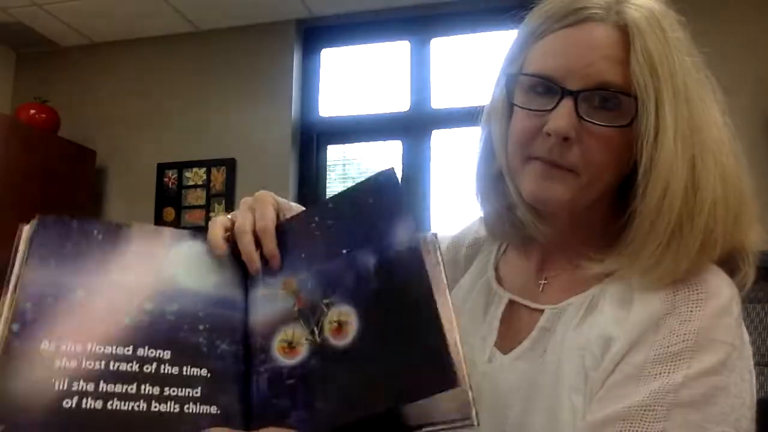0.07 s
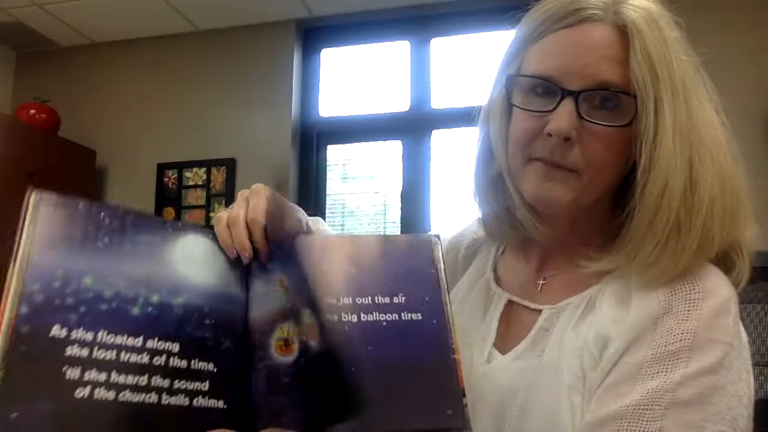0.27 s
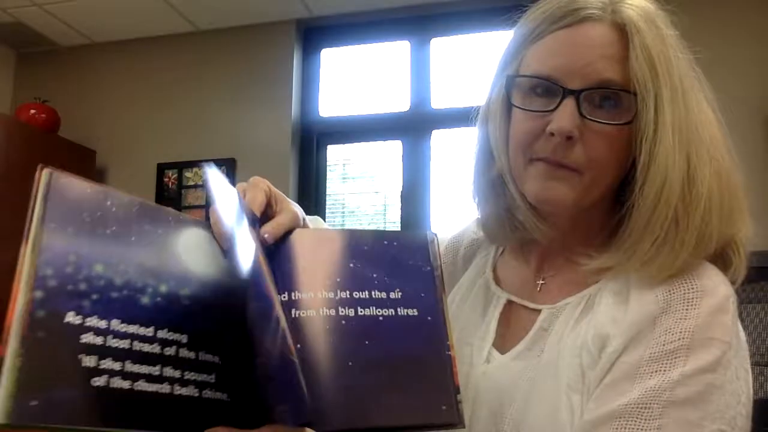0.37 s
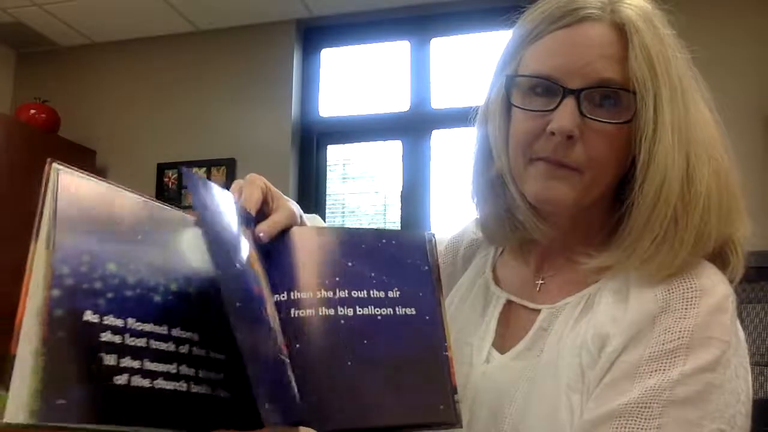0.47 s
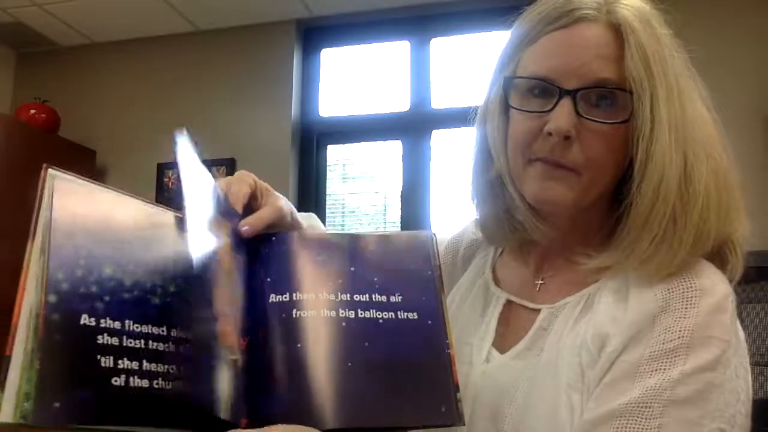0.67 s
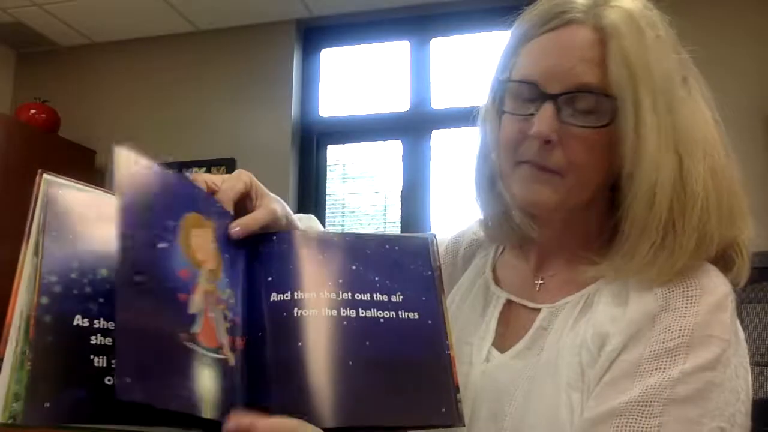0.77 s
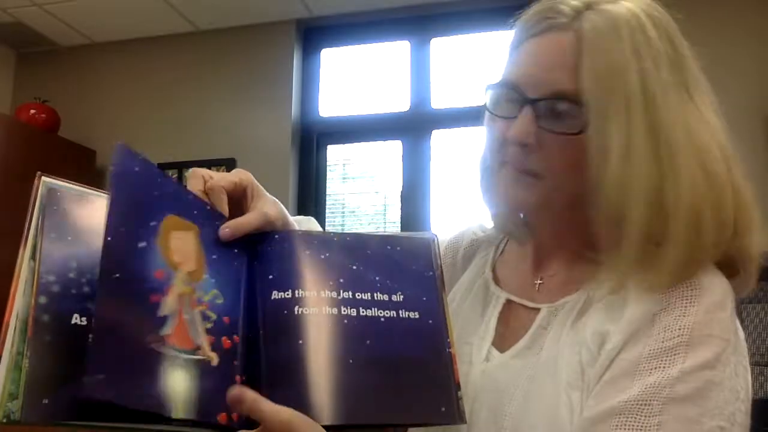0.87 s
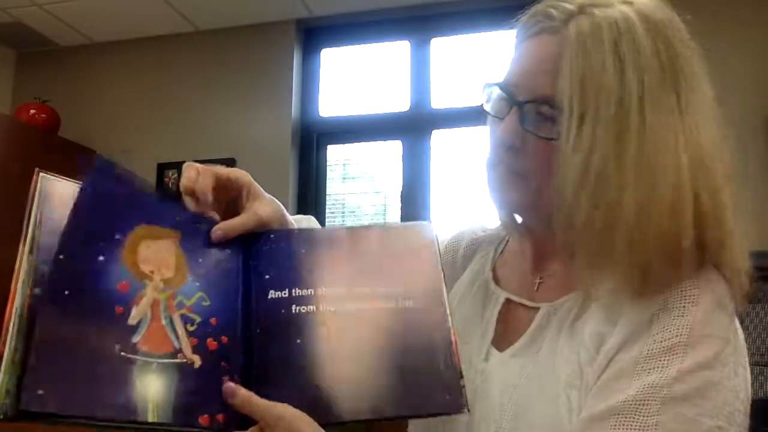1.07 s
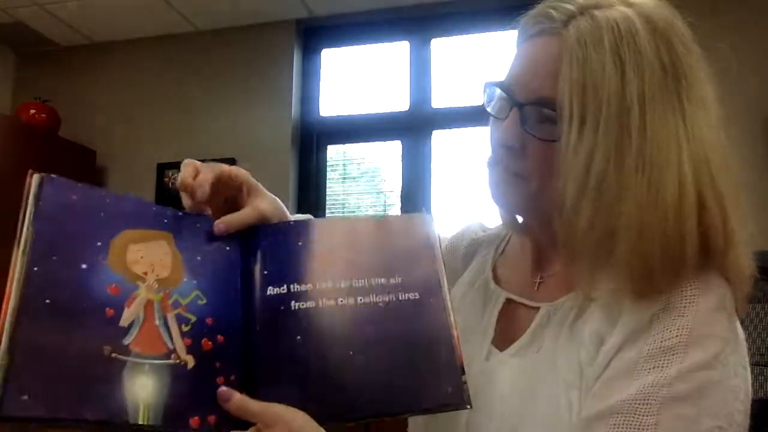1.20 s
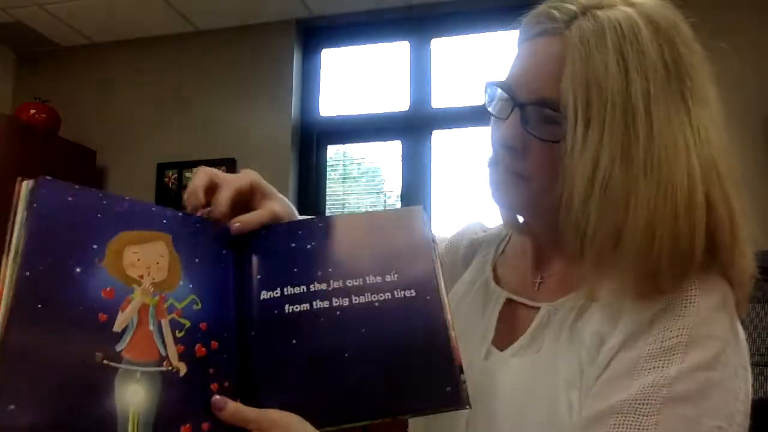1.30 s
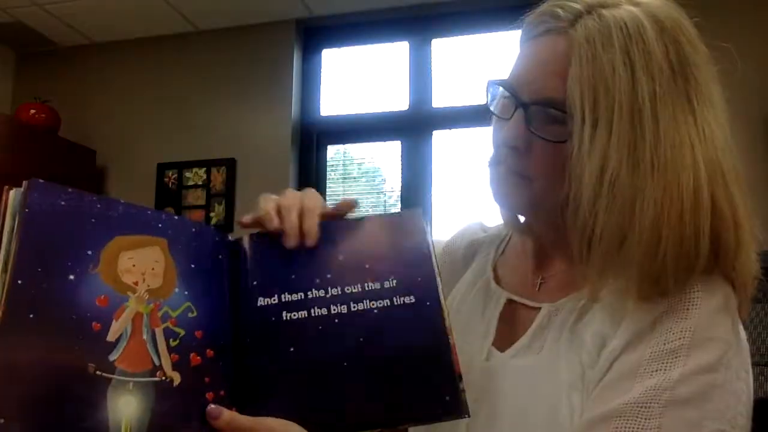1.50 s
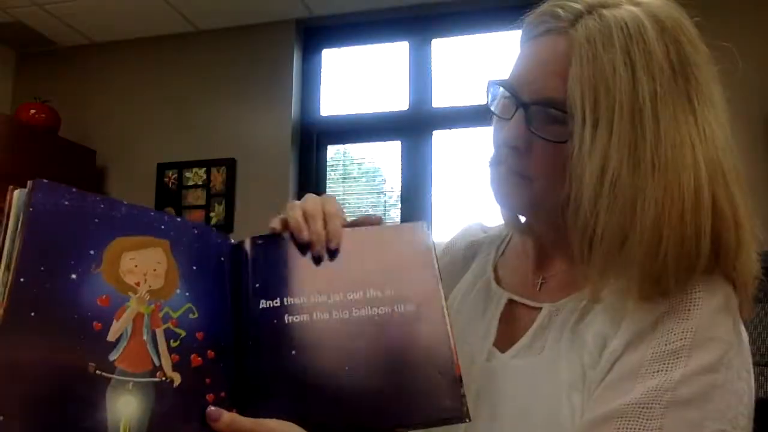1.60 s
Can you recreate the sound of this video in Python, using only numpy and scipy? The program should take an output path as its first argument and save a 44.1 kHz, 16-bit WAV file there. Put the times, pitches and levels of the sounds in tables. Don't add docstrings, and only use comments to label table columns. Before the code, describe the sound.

A large glossy page of a picture book is lifted with a faint dry rustle, sweeps over in a louder papery swish, then lands with soft flaps and crinkly snaps, close to a small microphone indoors.

```python
import sys
import numpy as np
from scipy import signal
from scipy.io import wavfile
from scipy.ndimage import uniform_filter1d

SR = 44100
rng = np.random.default_rng(int(sys.argv[2]) if len(sys.argv) > 2 else 0)


def boost_factor(decibels):
    exponent = np.asarray(decibels, float) / 20
    return 10 ** exponent


def wav_out(sig):
    wavfile.write(sys.argv[1], SR, np.round(np.clip(np.atleast_2d(sig).T, -1, 1) * 32767).astype(np.int16))


N = 72765

# time_s, level_db, ring_hz, top_edge_hz, belly_db (extra low-mid body of the sheet)
LIFT = [
    (0, -63.5, 3840, 6500, 5),
    (0.073, -71.5, 3600, 5900, 10),
    (0.084, -56.5, 3600, 5600, 6),
    (0.126, -67.5, 2600, 4960, 24),
    (0.133, -50.5, 3760, 6600, 5),
    (0.155, -51.5, 3940, 6600, 0),
    (0.178, -61.5, 3940, 6200, 6),
    (.199, -52, 3900, 6400, -12),
    (0.205, -46.5, 3630, 7200, -11),
]
RAISE = [
    (.255, -47.5, 3440, 7200, -13.5),
    (0.297, -54.5, 3300, 5400, -10),
    (.318, -52.5, 3400, 5000, 2),
    (0.335, -46.5, 3240, 6140, -5.5),
    (.37, -45.5, 3220, 4930, -4),
    (0.402, -42, 3150, 5840, 2),
    (0.472, -44.5, 3270, 4800, 8.5),
    (0.498, -51, 2500, 4330, 17),
]
SWEEP = [
    (0.511, -39.5, 2880, 6400, -3),
    (0.543, -39.5, 2860, 6360, 15),
    (0.574, -39.5, 2860, 6700, 4.5),
    (0.612, -34, 2590, 7500, 1.5),
    (.645, -31, 2360, 7500, -2),
    (0.678, -33.5, 3370, 6700, 4),
    (0.702, -41, 3500, 5560, -2.5),
    (.75, -49, 3500, 4900, 3),
]
SETTLE = [(0.818, -64, 3470, 4670, 5), (.84, -62, 3080, 4620, -1), (.847, -55.5, 2750, 5100, 1),
          (.91, -55, 2500, 4050, -3), (0.946, -48.5, 1960, 2900, 14), (0.962, -38, 1790, 2860, 14),
          (1.01, -52.5, 1830, 3100, 9), (1.029, -46, 2260, 3960, 4), (1.093, -51.5, 1800, 3030, -9),
          (1.111, -49, 2310, 6600, 19.5), (1.162, -53, 1700, 5200, 5.5), (1.181, -44.5, 1810, 3520, 6),
          (1.191, -57, 1880, 3460, 10), (1.211, -55.5, 1860, 3270, -1), (1.239, -67.5, 2170, 6450, 0.5),
          (1.322, -66.5, 2400, 6500, 10), (1.336, -81, 2400, 6080, -6)]
# pitch_hz, level_db
PAPER_COLOUR = [(240, -65), (500, -32.5), (800, -18.5), (1400, -5.5), (2400, -6.5), (5900, -13),
                (8500, -23), (12000, -32)]

# start_s, length_s, level_db, low_scrape_db (relative to the hiss)
RUBS = [(0, 0.016, -67, 14), (0.135, 0.039, -65.5, 9.5), (0.194, 0.046, -58, 2), (0.221, .055, -54, 5.5),
        (0.293, 0.24, -81, 25), (0.541, 0.029, -69.5, 19), (0.578, 0.051, -60.5, 7),
        (0.617, 0.054, -52.5, 6), (0.657, .042, -49.5, 2), (0.826, 0.072, -60, -2),
        (1.022, 0.064, -54.5, 0.5), (1.093, 0.053, -54, 6), (1.172, 0.019, -49.5, -10),
        (1.198, 0.024, -58, -25), (1.274, 0.061, -71, 5.5), (1.351, 0.036, -56.5, -17),
        (1.413, 0.021, -62.5, -10.5), (1.423, 0.04, -57, -18.5), (1.512, 0.042, -56, 3),
        (1.543, 0.061, -61.5, 1.5), (1.612, 0.055, -59.5, -16.5)]
# pitch_hz, level_db
SKIN_HISS = [(5290, -60), (9000, -43), (11000, -19.5), (11600, -5.5), (12300, -5.5), (13100, 1.5),
             (14100, 1), (14900, 0.5), (16200, -25)]
# pitch_hz, level_db
SKIN_SCRAPE = [(1500, -31), (2400, -16.5), (3900, -19), (4500, -21), (5000, 2), (5740, -3), (7160, -9),
               (10000, -25.5)]

# pitch_hz, level_db
AIR_COLOUR = [(30, -12), (70, -11.5), (150, -3.5), (350, -7), (1200, -22), (2700, -14), (8200, -23.5),
              (16200, -20)]
# pitch_hz, width_hz, boost_db
HUM = [(130, 45, 8), (68.7, 18.7, 3.4)]

# time_s, peak_db, ring_hz, treble_db, push_ms
SNAPS = [(0.0826, -33, 3500, 1.5, 0.76), (.0985, -46, 3560, -30, 2.7), (0.1047, -41, 1770, -37, 3.9),
         (0.204, -37, 2320, -30, 4.7), (0.5103, -31, 2567, -38, 7.3), (0.5466, -21.5, 2600, -25, .3),
         (.605, -18.5, 2630, -46, 4), (.612, -16, 2490, -39, 4.1), (.628, -16, 2660, -35, 3.6),
         (.844, -46, 2410, -40, 7.2), (0.868, -44, 2420, -40, 2.3), (0.8975, -38.5, 2290, -48.5, 9.5),
         (0.9186, -36, 1630, -49, 2.9), (.92, -37, 2570, -56, 3), (0.9197, -34.5, 900, -15, 1.7),
         (0.936, -38.5, 940, -51, 8), (.9495, -30, 1130, -49, 1.7), (0.9586, -18.5, 1854, -42, 2.64),
         (.9585, -26.5, 2650, -89, 3.7), (0.9592, -28, 1120, -29, 1.7), (.9635, -33.5, 857, -48, 2.3),
         (0.967, -36, 1800, -75, 3.7), (0.9753, -30, 1340, -50, 3), (.98, -37, 1810, -65, 2.1),
         (.985, -41, 1630, -60, 1.8), (1.013, -35, 1490, -50, 3.1), (1.022, -37.5, 2600, -60.5, 7.7),
         (1.0409, -29, 2600, -40, 1.9), (1.066, -32, 1940, -58, 2.3), (1.1029, -20, 1930, -19, 1.37),
         (1.105, -32.5, 3860, 2.5, 1.1), (1.1074, -15, 2530, -1.5, 1.43), (1.1086, -21, 1640, -28, 0.84),
         (1.1295, -33, 2300, -20, 0.86), (1.144, -28, 1650, -19, 1.2), (1.145, -29, 1670, -10, 3.1),
         (1.1827, -35.5, 2170, -15, 1.2), (1.1973, -29, 1850, -6, 1.35), (1.313, -50, 2310, -11, 8.4)]
# start_s, length_s, level_db, pitch_hz, width_share (of the pitch)
FLAPS = [
    (0.107, 0.025, -54.5, 530, 0.65),
    (0.116, 0.082, -62, 460, 1.4),
    (0.126, 0.038, -60.5, 1030, 0.86),
    (0.524, 0.28, -69.5, 323, 1.6),
    (0.904, 0.06, -57.5, 320, 1.1),
    (0.937, 0.077, -52, 268, 0.89),
    (.916, 0.13, -57.5, 710, 1.2),
    (1.107, .02, -55.5, 272, 0.98),
]
# pitch_hz, width_hz, boost_db
CAVITY = [(1018, 120, 3.5), (1371, 114, -10), (2400, 140, 3), (3150, 200, 0), (3950, 570, 4.5),
          (5050, 460, -3), (5930, 260, 3), (7500, 1110, -10), (8500, 1240, 4.5), (12390, 660, 6.5),
          (12860, 400, -10), (14500, 660, 0.5)]


def evened(x):
    return x / np.sqrt(np.mean(x ** 2) + 1e-20)


def read(points, hz):
    f, value = np.transpose(points)
    return np.interp(np.log(hz + 1), np.log(f + 1), value)


def add(mix, s, sound):
    part = mix[round(s * SR):][:len(sound)]
    part += sound[:len(part)]


def bumps(peaks, hz):
    return sum(db / (1 + (2 * (hz - f) / width) ** 2) for f, width, db in peaks)


def colour(x, db_of_hz):
    hz = abs(np.fft.fftfreq(4096, 1 / SR))
    log = np.log(boost_factor(np.maximum(db_of_hz(hz), -100)))
    taps = np.fft.ifft(np.exp(log - 1j * signal.hilbert(log).imag)).real[:2048]
    return signal.oaconvolve(x, taps)[:len(x)]


def ring(x, hz, width):
    b, a = signal.iirpeak(hz, hz / width, SR)
    for _ in range(3):
        x = signal.lfilter(b, a, x)
    return x


def grains(per_s, spread_db, clump_db, clump_s):
    chance, extra = rng.random(N), rng.exponential(1, N)
    slip, drift = rng.standard_normal(N), rng.standard_normal(N)
    span = max(int(clump_s * SR), 2)
    clumps = evened(uniform_filter1d(uniform_filter1d(drift, span), span))
    size = boost_factor(spread_db * np.minimum(extra, 3) + clump_db * clumps)
    return evened((chance < per_s / SR) * slip * size)


def patchy(x, patch_db):
    z = signal.stft(x, SR, nperseg=512, noverlap=384)[2]
    patches = uniform_filter1d(rng.standard_normal(z.shape), size=3, axis=0)
    patches = uniform_filter1d(patches, size=9, axis=1)
    z = z * boost_factor(patch_db * evened(patches))
    return evened(signal.istft(z, SR, nperseg=512, noverlap=384)[1][:N])


def page():
    ring_db, ring_oct, edge_db_per_oct = 8, 0.32, 39.5
    ring_gain_per_db, ring_ref_db = 0.1, -44
    edge_ring_hz, edge_ring_oct, edge_ring_share = 5960, 0.043, 0.36
    belly_hz, belly_oct = 950, 0.68
    s, level_db, ring_hz, edge_hz, belly_db = np.transpose(LIFT + RAISE + SWEEP + SETTLE)

    slips = grains(per_s=15000, spread_db=1.2, clump_db=1.1, clump_s=.004)
    slips = patchy(slips, patch_db=2.5)
    hz, t, z = signal.stft(slips, SR, nperseg=256, noverlap=192)
    f = hz[:, None] + 50

    depth_db = ring_db + ring_gain_per_db * (ring_ref_db - np.interp(t, s, level_db))
    depth_db = np.clip(depth_db, 1, 14)
    hump = depth_db / (1 + (np.log2(f / np.interp(t, s, ring_hz)) / ring_oct) ** 2)
    edge_ring = edge_ring_share * depth_db / (1 + (np.log2(f / edge_ring_hz) / edge_ring_oct) ** 2)
    edge = -np.clip(edge_db_per_oct * np.log2(f / np.interp(t, s, edge_hz)), 0, 22)
    belly = np.interp(t, s, belly_db) * np.exp(-(np.log2(f / belly_hz) / belly_oct) ** 2)

    smooth = boost_factor(read(PAPER_COLOUR, hz)[:, None] + hump + edge_ring + edge + belly)
    smooth[:2] = 0
    shape = smooth / np.sqrt((smooth[8:41] ** 2).sum(0) / len(hz))
    x = signal.istft(z * shape, SR, nperseg=256, noverlap=192)[1][:N]
    steady = np.sqrt(uniform_filter1d(uniform_filter1d(x ** 2, size=900), size=900) + 1e-9)
    return x / steady * boost_factor(np.interp(np.arange(N) / SR, s, level_db, right=-120))


def fingers():
    rise_share, fall_share, fade_db = 0.24, 0.36, -14
    slips = grains(per_s=9600, spread_db=1.5, clump_db=1.1, clump_s=0.0043)
    slips = patchy(slips, patch_db=3.5)
    hiss = evened(colour(slips, lambda f: read(SKIN_HISS, f)))
    scrape = evened(colour(slips, lambda f: read(SKIN_SCRAPE, f)))
    out = np.zeros(N)
    for s, length, db, low_db in RUBS:
        u = np.arange(0, 1, 1 / (length * 1.24 * SR))
        ramp = np.clip(np.minimum(u / rise_share, (1 - u) / fall_share), 0, 1)
        shape = np.sin(np.pi / 2 * ramp) ** 2 * boost_factor(fade_db * u)
        at = np.minimum(round(s * SR) + np.arange(len(u)), N - 1)
        add(out, s, boost_factor(db) * shape * (hiss[at] + boost_factor(low_db) * scrape[at]))
    return out


def room_hiss():
    noise = rng.standard_normal(N)
    return boost_factor(-73.5) * evened(colour(noise, lambda f: read(AIR_COLOUR, f) + bumps(HUM, f)))


def whine():
    count, start_s, per_s, burst_s = 50, .0105, 30, .009
    pitch_hz, level_db, spread_db, jitter_s = 11050, -69, 3.5, 0.00031
    out, t = np.zeros(N), np.arange(0, burst_s, 1 / SR)
    burst = np.sin(np.pi * t / burst_s) * np.sin(2 * np.pi * pitch_hz * t)
    for k, (louder, later) in enumerate(rng.standard_normal((count, 2))):
        add(out, start_s + k / per_s + jitter_s * later, boost_factor(level_db + spread_db * louder) * burst)
    return out


def snaps():
    width_share, upper_ratio, upper_width_share, upper_db = .9, 1.9, 0.46, -7
    tail_s, tail_db = 0.029, -22
    out, t = np.zeros(N), np.arange(3000) / SR
    fizz = rng.standard_normal((len(SNAPS), len(t)))
    for (s, db, hz, treble_db, push_ms), n in zip(SNAPS, fizz):
        push = np.sin(np.pi * np.clip(t * 1000 / max(push_ms, .06), 0, 1)) ** 2
        tail = boost_factor(tail_db - 60 * t / tail_s) * n * np.minimum(t * 1000, 1)
        body = ring(push * (np.sin(2 * np.pi * hz * t) + .5 * n) + tail, hz, width_share * hz)
        upper = ring(push * n + tail, hz * upper_ratio, upper_width_share * hz)
        tick = evened(colour(push * n, lambda f: read(SKIN_HISS, f)))
        tick = tick + evened(colour(push * n, lambda f: read(SKIN_SCRAPE, f)))
        upper_gain = boost_factor(upper_db + 0.25 * treble_db)
        snap = body / abs(body).max() + upper_gain * upper / abs(upper).max()
        snap = snap + boost_factor(treble_db) * tick / abs(tick).max()
        add(out, s, boost_factor(db - 5.5) * snap)
    return out


def flaps():
    out, noise = np.zeros(N), rng.standard_normal((len(FLAPS), 16000))
    for (s, length, db, hz, share), n in zip(FLAPS, noise):
        u = np.arange(n.size) / SR / length
        shape = np.minimum(u / .12, 1) * np.exp(-2.5 * u * u)
        puff = ring(n, hz, share * hz) * shape
        add(out, s, boost_factor(db) * puff * np.linalg.norm(shape) / np.linalg.norm(puff))
    return out


def room(x):
    t60_s = .09
    taps = np.zeros(8000)
    at = np.arange(60, 7960, 20)
    taps[at + rng.integers(0, 20, len(at))] = rng.choice([-1., 1.], len(at))
    taps *= boost_factor(-60 * np.arange(8000) / SR / t60_s)
    return signal.oaconvolve(x, taps / np.linalg.norm(taps))[:N]


def loudness_db(x):
    return 10 * np.log10(abs(uniform_filter1d(x ** 2, size=900)) + 1e-12)


def suppressed(air, tone, book, paper):
    open_db, span_db, hiss_lift_db, rumble_lift_db = -77.5, 18.5, 4.5, 6.5
    whine_shut_db, split_hz = -85, 487
    rumble = signal.sosfiltfilt(signal.butter(2, split_hz, fs=SR, output="sos"), air)
    opened = np.clip((loudness_db(book) - open_db) / span_db, 0, 1)
    heard = np.clip((loudness_db(paper) - whine_shut_db) / 10, .15, 1)
    low = boost_factor(rumble_lift_db * (opened - .5)) * rumble
    high = boost_factor(hiss_lift_db * opened) * (air - rumble)
    return low + high + heard * tone


def scene():
    paper = page()
    book = paper + fingers() + snaps() + flaps()
    book = colour(book + boost_factor(-12) * room(book), lambda f: bumps(CAVITY, f))
    return (book + suppressed(room_hiss(), whine(), book, paper))[None]


def roll_off(x):
    return signal.sosfilt(signal.butter(12, 16480, fs=SR, output="sos"), x)


def record(dry):
    low_cut_hz, top_hz = 58, 15850
    band_limit = signal.firwin(511, top_hz, window=("kaiser", 9), fs=SR)
    mix = signal.oaconvolve(dry, band_limit[None], "same")
    mix = signal.sosfilt(signal.butter(2, low_cut_hz, "high", fs=SR, output="sos"), mix)
    return roll_off(mix)


dry = scene()
out = record(dry)
wav_out(out)
```